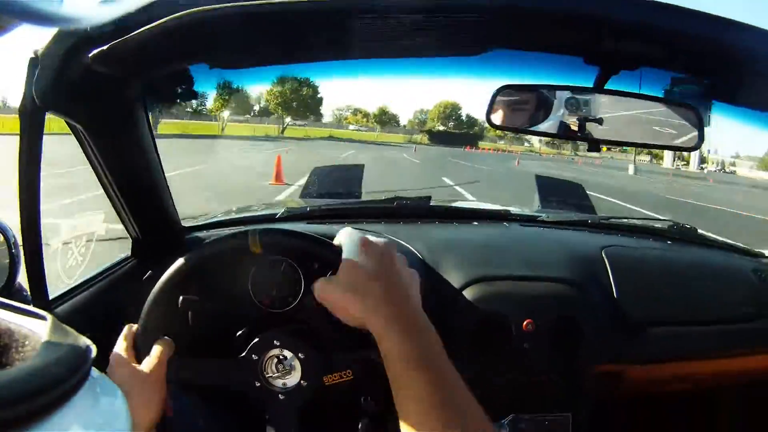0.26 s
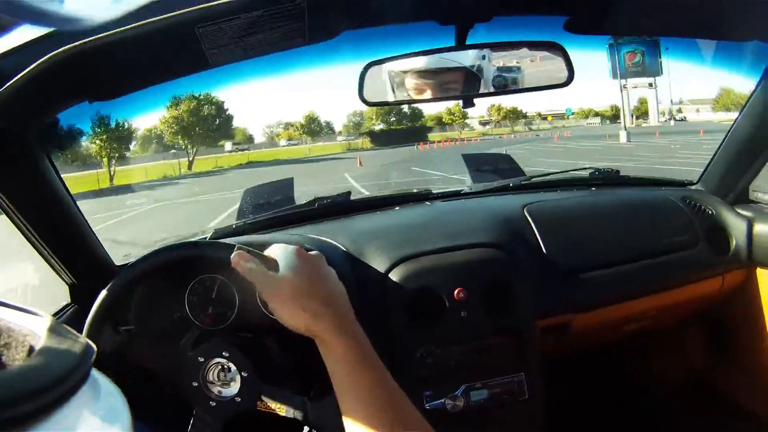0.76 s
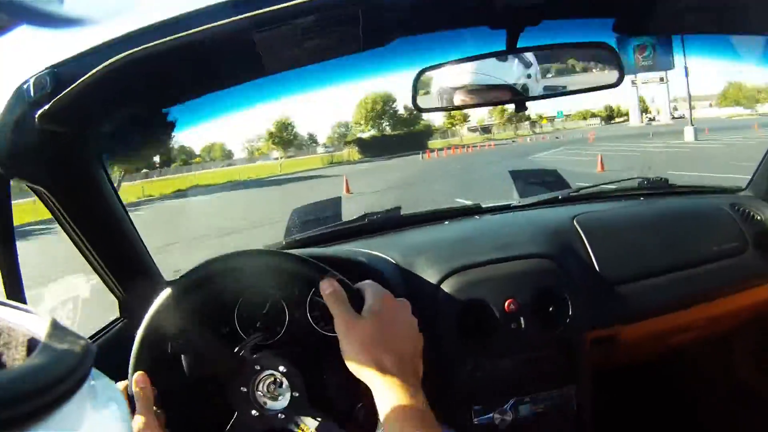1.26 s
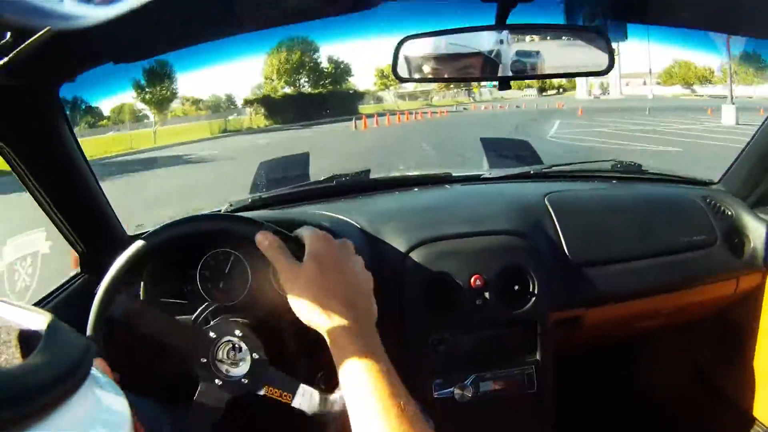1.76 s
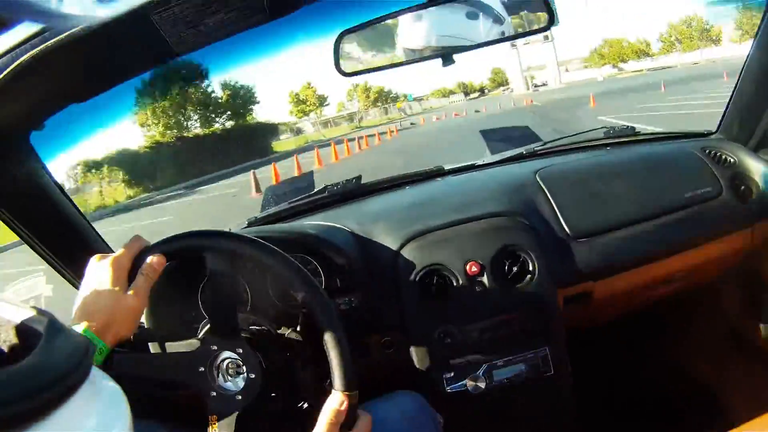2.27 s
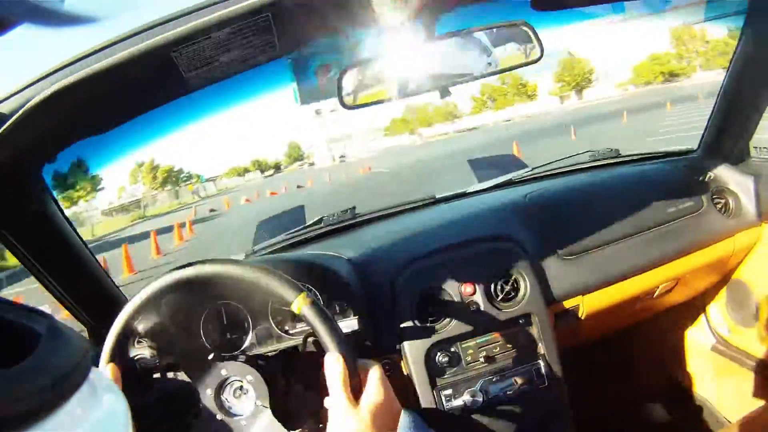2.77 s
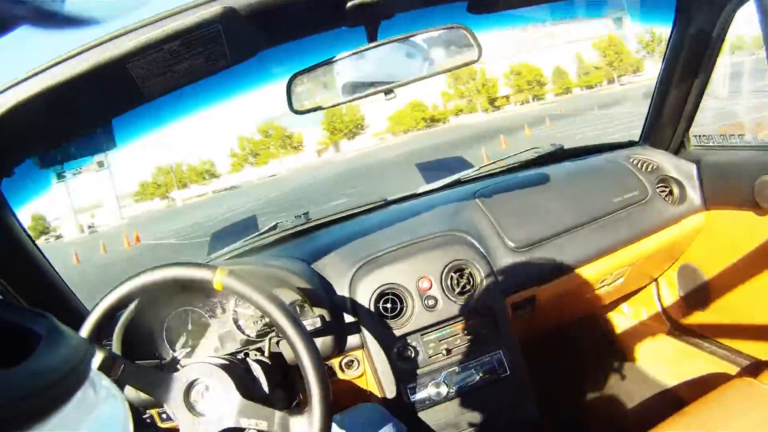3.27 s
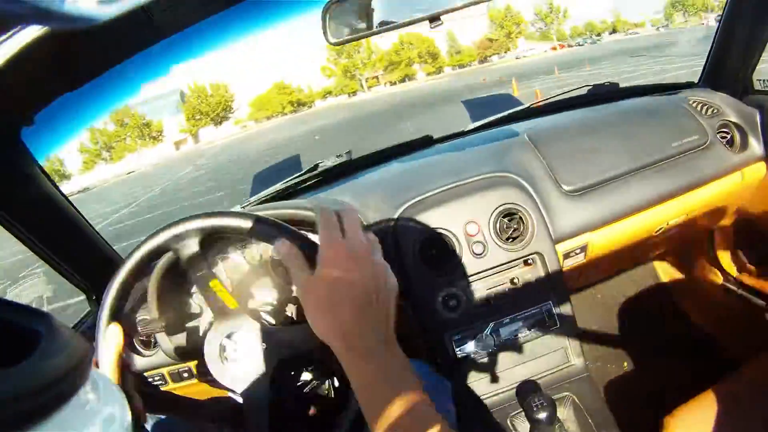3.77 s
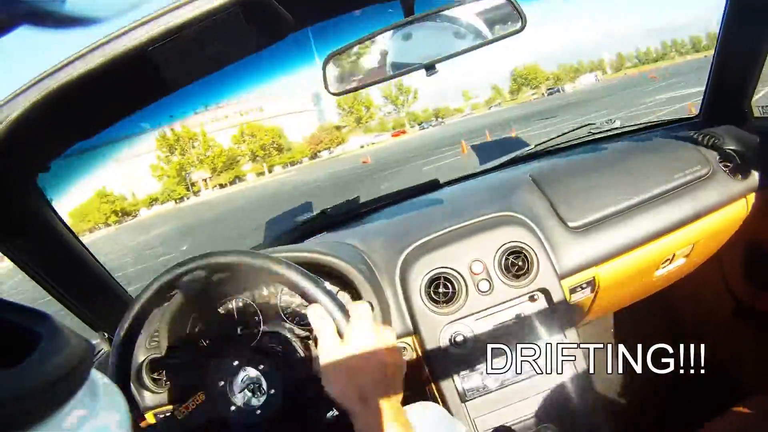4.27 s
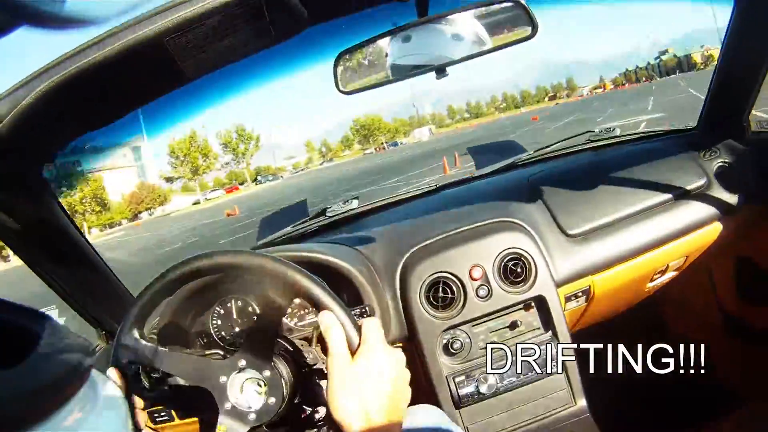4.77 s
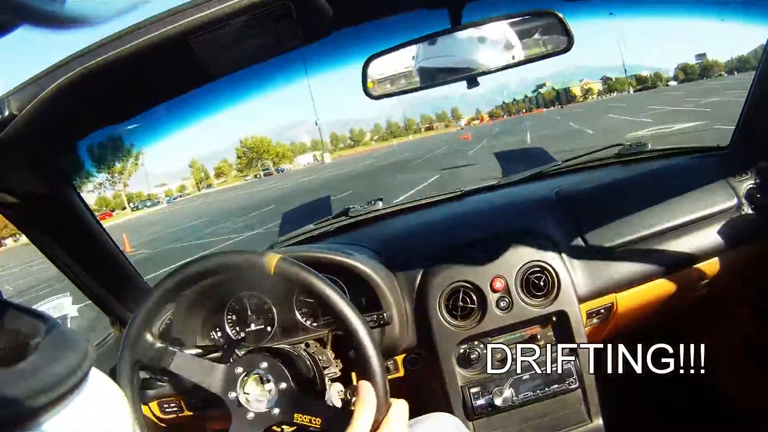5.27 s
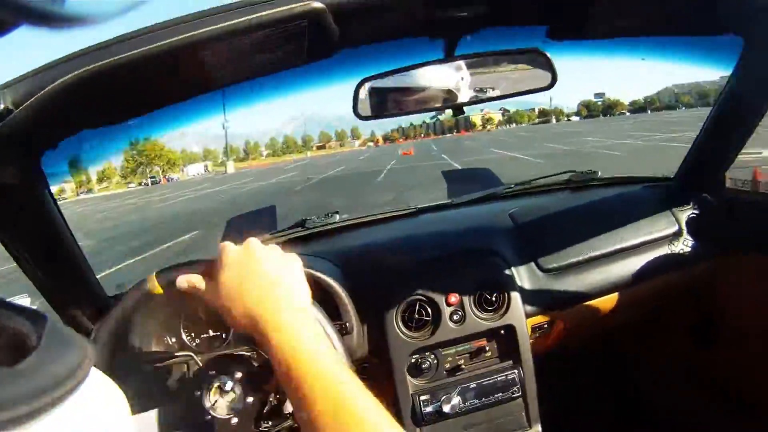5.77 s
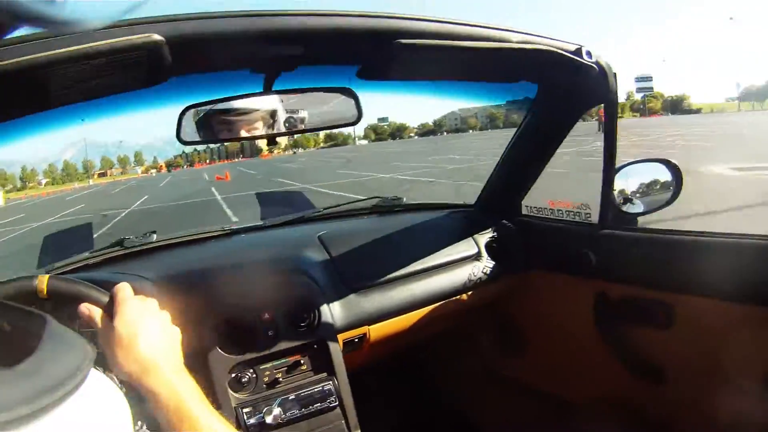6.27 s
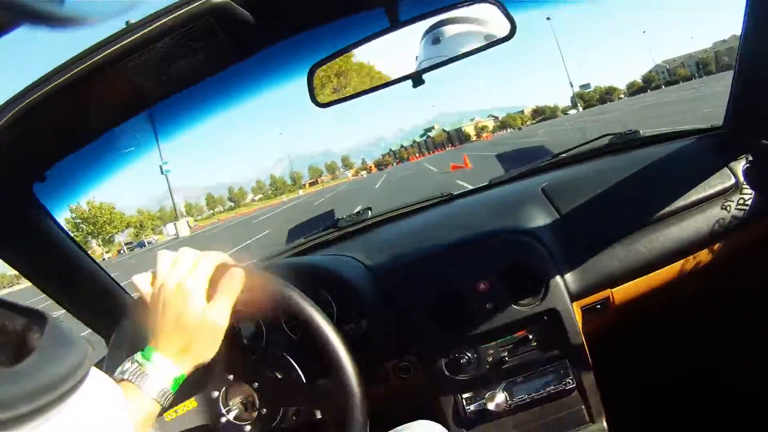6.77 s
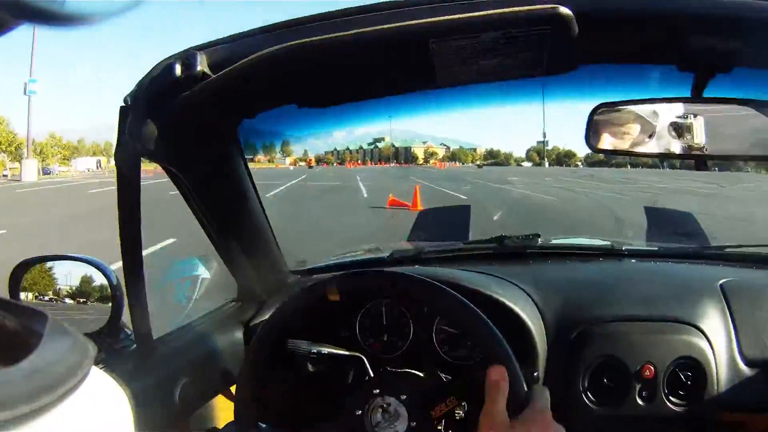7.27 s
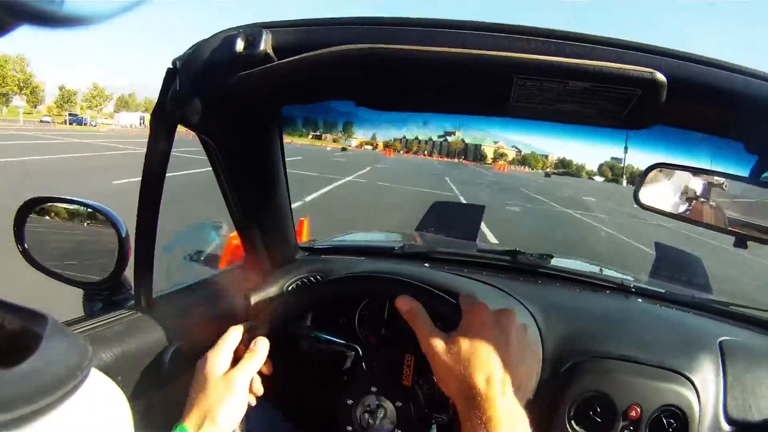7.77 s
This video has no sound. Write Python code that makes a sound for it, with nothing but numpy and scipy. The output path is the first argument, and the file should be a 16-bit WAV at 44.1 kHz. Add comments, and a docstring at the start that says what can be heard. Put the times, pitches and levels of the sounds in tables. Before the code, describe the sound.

Heard from inside an open car, tyres screech in a long skid over thumping wind and a droning engine.

```python
"""Wind thumps and roars over a humming engine, then tyres squeal: a small open car slides through a
long corner on a paved lot. The rubber sticks and slips hundreds of times a second, which makes
it sing, and hisses as it scrubs over the paving. Something loose knocks, and bumps thud.
We listen from a camera inside the car. Its case colours everything, and it holds each
sample at a low rate, which mirrors the sound into the treble."""
import sys
import numpy as np
from scipy import signal
from scipy.fft import rfft, irfft, next_fast_len
from scipy.io import wavfile
from scipy.ndimage import uniform_filter1d

SR = 44100
rng = np.random.default_rng(int(sys.argv[2]) if len(sys.argv) > 2 else 0)


def to_wav(sig):
    """Store sig (one row per channel, or 1-D mono) as 16-bit WAV at the path in sys.argv[1].

    Samples outside -1..1 are clipped; the rate is SR.
    """
    pcm = np.clip(np.atleast_2d(sig), -1, 1) * 32767
    pcm = np.round(pcm).astype(np.int16)
    wavfile.write(sys.argv[1], SR, pcm.T)  # frames by channels


N = 354123

# Levels are starting values: the functions and the camera case raise or lower them.
# air throbbing in the open cabin: t/s, level/dB
CABIN_THROB = [(0, -31), (2.4, -31), (3.1, -33), (4.2, -33), (5.1, -44.5), (5.6, -36.5), (7.0, -41.5),
               (7.45, -33.5), (8.03, -37.5)]
# strong gusts over the windscreen: t/s, length/s, level/dB
WIND_GUSTS = [(0.02, 0.21, -21), (0.3, 0.12, -26), (0.79, 0.16, -20.5), (0.972, 0.051, -22.5),
              (1.06, 0.18, -20.5), (1.442, 0.042, -23), (1.828, 0.062, -21.5), (2.051, 0.029, -23),
              (2.341, 0.12, -25)]
GUST_PEAK_AT = 0.73  # share of the way through a gust
# wind and road roar: t/s, level/dB
ROAR_LEVEL = [(0, -32.5), (2.15, -33), (4.2, -31.5), (6.3, -36.5), (8.03, -32.5)]
# tone colour of the roar: f/Hz, level/dB
ROAR_EQ = [(25, 16), (60, 4), (110, 3), (200, -5.5), (800, -10.5), (6000, -6.5)]

# engine note: t/s, firing f/Hz, level/dB, load boost/dB for all tones but the lowest
ENGINE_NOTE = [(0, 152.4, -48.5, 3), (1.2, 175.7, -49, 1), (1.35, 170.7, -65, -12), (1.5, 167.4, -47.5, -4),
               (1.9, 164.7, -50, -1), (2.65, 133, -50.5, -17), (3.2, 156.4, -49, -4), (3.55, 129.7, -56, 6),
               (3.75, 136.1, -49.5, -2), (4.3, 147.2, -50, 7), (5.2, 141.3, -55.5, -0.5),
               (5.3, 127.6, -46, -1.5), (5.9, 111.5, -50, -11), (6.05, 118.3, -45, -2),
               (6.3, 117, -41, -12), (7.1, 132.4, -47, -1.5), (7.6, 133.7, -43, -2.5),
               (8.03, 140.7, -44.5, -3.5)]
# engine tones: multiple of the firing rate, level/dB
ENGINE_TONES = [(1, 0), (1.75, -13.5), (2, -12), (3, -19.5), (3.5, -18.5)]
PIPE_HZ, PIPE_WIDTH_HZ, PIPE_DB = 482, 39, 8.5  # the exhaust boosts tones near its own pitch

# something loose in the cabin: t/s, level/dB, brightness/dB, time to fade by 60 dB/s
LOOSE_KNOCKS = [(0.9696, -26, 7, 0.048), (0.991, -25, 6, 0.028), (1.016, -22, 0, 0.062),
                (1.043, -29.5, -1, 0.03), (1.5924, -31, 19, 0.07), (7.8197, -23, 22, 0.037)]
# thuds over bumps: t/s, level/dB
ROAD_BUMPS = [(1.43, -26), (4.266, -28), (6.965, -27.5)]

# rubber scrubbing on paving, one list a slide: t/s, level/dB
SCRUB_SLIDES = [
    [(.85, -40), (1.1, -38), (1.7, -44.5)],
    [(1.95, -45.5), (2.54, -32), (3.2, -23), (3.85, -22.5), (4.87, -21), (5.38, -24), (5.81, -23),
     (6.14, -42.5), (6.3, -72)],
    [(6.65, -46), (7.1, -35.5), (7.45, -53)],
]
# tone colour of the scrub: f/Hz, level/dB
SCRUB_EQ = [(400, -46), (690, -4), (800, -5), (2300, 2.5), (3500, -1), (6000, -3.5)]
# A tyre sings at its slip rate (partial 1) and at multiples of it (partials 2, 3, ...).
# lightly loaded treads, one list a slide: t/s, slip f/Hz, partial 1 level/dB, partial 2 level/dB
LIGHT_TREADS = [
    [(0, 945, -55.5, -82), (1.0, 949.4, -51.5, -66), (1.1, 835, -45.5, -66), (1.6, 963, -60.5, -65)],
    [(2.3, 924.5, -44, -63), (2.5, 885.5, -37, -48), (2.9, 881.2, -33, -44.5), (3.4, 865, -34, -42.5)],
    [(5.75, 853, -39, -45), (6.13, 923, -45.5, -60), (6.2, 1034, -70, -71)],
]
# brief thin chirps, one list each: t/s, slip f/Hz, partial 1 level/dB, partial 2 level/dB
TREAD_CHIRPS = [
    [(2.09, 987.4, -44.5, -62), (2.24, 940, -37, -52), (2.36, 859, -50, -50), (2.42, 836, -40, -40)],
    [(6.66, 1058, -53, -64), (6.74, 987, -41.5, -47.5), (6.8, 991, -43, -53)],
    [(6.89, 983, -43, -50), (6.96, 943, -40, -53), (7.08, 1040, -45.5, -57), (7.3, 965, -38, -56)],
    [(6.98, 971.4, -40, -61), (7.13, 849, -38.5, -44.5), (7.24, 888, -43, -51), (7.34, 902, -43, -66)],
    [(6.885, 789, -45, -52), (7.22, 742, -45.5, -75)],
]
# a tyre heard mostly by partial 2: t/s, f/Hz of that partial, level/dB
HIGH_TYRE = [(2.33, 1720, -55), (2.42, 1690, -43), (2.55, 1620, -45.5), (2.95, 1625, -32.5),
             (3.14, 1611, -37.5), (4.5, 1632, -36.5), (5.37, 1592, -42), (5.98, 1576, -39),
             (6.12, 1732, -44.5)]
# steady rasp of two tyres, A and B: t/s, A level/dB, B level/dB
PAIR_RASP = [(2.75, -61, -51), (3.15, -55.5, -58), (4.4, -41.5, -61), (5.5, -40, -41.5), (5.85, -43.5, -50),
             (6.05, -50.5, -52)]
# their bright screeches: t/s, length/s, A level/dB, B level/dB, A slip f/Hz, B slip f/Hz
PAIR_SCREECHES = [(3.199, 0.09, -32.5, -38, 746, 722), (3.334, 0.077, -37, -38.5, 741, 726),
                  (3.47, 0.13, -33.5, -34.5, 715, 714), (3.631, 0.1294, -34, -35.5, 722, 721),
                  (3.894, .2, -34.5, -41, 749, 752), (4.2, 0.11, -38, -42, 755, 755),
                  (4.339, 0.079, -37, -41, 732, 750), (4.5, 0.089, -42, -34, 765, 761),
                  (4.63, 0.13, -34.5, -35, 746, 747), (4.767, 0.093, -32, -34, 731, 727),
                  (4.863, 0.0906, -43, -30, 740, 755.5), (5.004, 0.11, -35.5, -38.5, 735, 741),
                  (5.169, 0.09, -34.5, -33, 724, 717.6), (5.266, 0.14, -31.5, -33, 748, 723),
                  (5.589, 0.099, -38.5, -41, 721, 731)]
# the most loaded tyre, murmuring between squeals: t/s, slip f/Hz, level/dB
LOADED_MURMUR = [(2.35, 760, -53.5), (2.66, 784, -38.5), (3.1, 795, -46), (3.3, 767, -36.5),
                 (5.5, 746, -38), (5.88, 729, -35), (5.97, 758, -38), (6.05, 789, -53)]
# its separate squeals: t/s, length/s, level/dB, slip f/Hz
LOADED_SQUEALS = [(3.177, 0.072, -30, 773), (3.268, 0.12, -29, 757.4), (3.406, 0.079, -26, 750),
                  (3.487, 0.056, -29.5, 724), (3.538, 0.038, -28, 748), (3.575, 0.033, -29, 745),
                  (3.627, 0.053, -25.5, 760), (3.707, 0.084, -29, 729), (3.887, 0.065, -27, 754.5),
                  (3.983, 0.12, -29, 752), (4.1, 0.087, -28, 757.4), (4.202, 0.089, -26.5, 759.4),
                  (4.357, 0.029, -28.5, 717), (4.428, 0.071, -24, 763.5), (4.504, 0.1, -27.5, 756),
                  (4.608, 0.099, -25, 763), (4.797, 0.057, -27.5, 740.5), (4.857, 0.078, -26.5, 759.6),
                  (5.018, 0.081, -28.5, 738.3), (5.13, 0.092, -30.5, 736), (5.283, 0.104, -30, 724.7),
                  (5.393, 0.085, -30, 738), (5.555, 0.027, -28.5, 741), (5.59, 0.039, -32, 728.5),
                  (5.708, 0.07, -30.5, 760), (5.813, 0.038, -30.5, 717)]
# overtones of a squeal: multiple of the slip rate, level/dB against partial 1
SQUEAL_OVERTONES = [(2, -8), (3, -14), (4, -12), (5, -13.5)]
ATTACK_S, RELEASE_S = 0.0093, 0.015  # a burst catches, holds, then lets go

# tone colour of the camera case: f/Hz, level/dB
CASE_EQ = [(600, -2.5), (750, 2), (1040, 2.5), (1250, -9), (1460, 3), (1640, -2), (1800, -8), (1990, 1.5),
           (2350, -0.5), (2600, -10.5), (2900, -6.5), (3280, -17.5), (3780, -10.5), (4100, -21),
           (5800, -27)]
# faint difference between left and right: f/Hz, level/dB against the shared sound
STEREO_SPREAD = [(60, -37), (2380, -24), (15000, -20.5)]
HOLD_HZ, TREBLE_LIMIT_HZ = 12000, 15400
TICK_S, TICK_DB = 7.4528, -25.5  # the waveform jumps once: a dry tick
TIME = np.arange(N) / SR


def gain_of(db):
    """Turn decibels into a multiplier."""
    return 10 ** (np.asarray(db) / 20)


def unit_rms(x):
    """Scale a signal to an average strength (rms) of 1."""
    return x / np.sqrt(np.mean(x ** 2) + 1e-20)


def colour_gains(colour, size):
    """Turn a tone colour table into one multiplier per frequency."""
    hz, db = np.transpose(colour)
    bin_hz = np.fft.rfftfreq(size, 1 / SR)
    return gain_of(np.interp(np.log(bin_hz + 1), np.log(hz + 1), db))


def coloured(x, colour):
    """Give a sound a tone colour."""
    size = next_fast_len(N + 4096)
    return irfft(rfft(x, size) * colour_gains(colour, size), size)[:N]


def curves(rows):
    """A gate that is open from the first row to the last, then each column at every sample."""
    times, *columns = np.transpose(rows)
    gate = np.clip(np.minimum(TIME - times[0] + 0.049, times[-1] + 0.021 - TIME) / 0.051, 0, 1)
    return gate, *(np.interp(TIME, times, column) for column in columns)


def wander(top_hz):
    """A smooth random wobble; a higher top_hz makes it quicker."""
    steps = rng.standard_normal(int(N / SR * 400) + 2)  # 400 steps a second
    smooth = signal.lfilter(*signal.butter(2, np.clip(top_hz / 200, .002, .95)), steps)
    return unit_rms(np.interp(TIME * 400, np.arange(len(steps)), smooth))


def restless_noise(colour, patchy_db, flicker_db):
    """Noise whose pitch bands swell in patches while the whole of it flickers."""
    frames = N // 128 + 5
    real, imag, patches = rng.standard_normal((frames, 257, 3)).T
    patches = uniform_filter1d(patches, size=4, axis=0)  # smooth across pitch
    patches = unit_rms(uniform_filter1d(patches, size=20, axis=1))  # and across time
    flicker = unit_rms(uniform_filter1d(rng.standard_normal(frames), size=10))
    spectra = (real + 1j * imag) * gain_of(patchy_db * patches + flicker_db * flicker)
    white = signal.istft(spectra, nperseg=512, noverlap=384)[1]
    return unit_rms(coloured(white[:N], colour))


def bursts(starts, lengths, levels_db):
    """Loudness of separate bursts: each rises, holds and falls."""
    size = np.zeros(N)
    for start, length, db in zip(starts, lengths, levels_db):
        edges = np.minimum((TIME - start) / ATTACK_S, (start + length - TIME) / RELEASE_S)
        size = np.maximum(size, np.clip(edges, 0, 1) * gain_of(db))
    return size


def sine(cycles, db):
    """A pure tone that starts at a random point in its cycle."""
    return np.sqrt(2) * gain_of(db) * np.sin(2 * np.pi * (cycles + rng.random()))


def gusts():
    """Strength of the gusts: each rises to its peak and drops away faster."""
    size = np.zeros(N)
    for start, length, db in WIND_GUSTS:
        ramp = np.interp(TIME, start + length * np.array([-.15, GUST_PEAK_AT, 1.1]), [0, 1, 0])
        size = np.maximum(size, gain_of(db) * np.sin(np.pi / 2 * ramp))
    return size


def wind():
    """Air throbs and rumbles in the open cabin, over a broad wind and road roar."""
    throb_hz = 40 * (1 + 0.07 * wander(8.05))
    throb = np.sqrt(2) * gain_of(2.5 * wander(25) - 1) * np.sin(2 * np.pi * np.cumsum(throb_hz) / SR)
    rumble = unit_rms(coloured(rng.standard_normal(N), [(18, 6), (40, 18), (75, -0.5), (160, -36.5)]))
    roar = restless_noise(ROAR_EQ, patchy_db=1.5, flicker_db=1.28)
    strength = np.maximum(gain_of(curves(CABIN_THROB)[1] + 2.5 * wander(6.2)), gusts())
    return strength * (throb + gain_of(-10.5) * rumble) + gain_of(curves(ROAR_LEVEL)[1]) * roar


def engine():
    """Tones at multiples of the firing rate; uneven cylinders add the in-between ones."""
    _, firing_hz, db, load_db = curves(ENGINE_NOTE)
    cycles = np.cumsum(firing_hz * (1 + .002 * wander(8))) / SR
    db = db + wander(6)
    out = np.zeros(N)
    for multiple, tone_db in ENGINE_TONES:
        pipe_db = PIPE_DB * np.exp(-((multiple * firing_hz - PIPE_HZ) / PIPE_WIDTH_HZ) ** 2)
        out += sine(multiple * cycles, db + tone_db + (multiple != 1) * load_db + pipe_db)
    return out


def add_hit(mix, start, db, fade_s, colour):
    """Add a puff of noise that starts sharply and falls 60 dB in fade_s."""
    t = TIME[:16384]
    puff = unit_rms(irfft(rfft(rng.standard_normal(len(t))) * colour_gains(colour, len(t))))
    attack = 1 - np.exp(-t / (0.01 * fade_s))
    mix[round(start * SR):][:len(t)] += attack * gain_of(db - 60 * t / fade_s) * puff


def knocks_and_bumps():
    """Something loose clacks and the camera case rings with it; the suspension gives longer, dull thuds."""
    out = np.zeros(N + 16384)
    for start, db, bright_db, fade_s in LOOSE_KNOCKS:
        case_ring = [(1100, -30), (1600, -bright_db), (2650, 3.5), (2850, 13.5), (3050, -1),
                     (6000, bright_db), (7000, -40)]
        add_hit(out, start, db, fade_s, case_ring)
    for start, db in ROAD_BUMPS:
        add_hit(out, start, db, fade_s=.21, colour=[(40, 10), (150, -9), (400, -21.5), (1200, -27)])
    return out[:N]


def scrub():
    """Rubber dragged over the paving hisses during each slide."""
    size = sum(gate * gain_of(db) for gate, db in map(curves, SCRUB_SLIDES))
    return size * restless_noise(SCRUB_EQ, patchy_db=1.5, flicker_db=1.5)


def stick_slip(hz, partials, jitter, jitter_hz, flutter_db):
    """Tread grips and lets go: partials share one shaky pitch, but each swells on its own."""
    cycles = np.cumsum(hz * (1 + jitter * wander(jitter_hz))) / SR
    return sum(sine(multiple * cycles, db + flutter_db * wander(42)) for multiple, db in partials)


def singing_treads(slides, count, spread):
    """Neighbouring tread blocks sing together, each drifting around their common pitch."""
    out = np.zeros(N)
    for gate, hz, db1, db2 in map(curves, slides):
        partials = [(1, db1 - 9), (2, db2 + 1)]
        for _ in range(count):
            own_hz = hz * (1 + spread * wander(5))
            out += gate * stick_slip(own_hz, partials, jitter=.015, jitter_hz=50, flutter_db=3.2)
    return out


def high_tyre():
    """One tyre sings loudest an octave above its slip rate."""
    gate, hz, db = curves(HIGH_TYRE)
    partials = [(1, db - 10.5), (2, db + 2)]
    return gate * stick_slip(hz / 2, partials, jitter=.012, jitter_hz=45, flutter_db=3)


def screeching_pair():
    """Two tyres rasp on their upper partials and swell into bright screeches."""
    starts, lengths, top_a, top_b, *slip_rates = np.transpose(PAIR_SCREECHES)
    hz_a, hz_b = (np.interp(TIME, starts + lengths / 2, hz) for hz in slip_rates)
    gate, rasp_a, rasp_b = curves(PAIR_RASP)
    db_a = 20 * np.log10(np.maximum(gain_of(rasp_a), bursts(starts, lengths, top_a)))
    db_b = 20 * np.log10(np.maximum(gain_of(rasp_b), bursts(starts, lengths, top_b)))
    shaky = dict(jitter=.0035, jitter_hz=15, flutter_db=1.6)
    tyre_a = stick_slip(hz_a, [(2, db_a)], **shaky)
    tyre_b = stick_slip(hz_b, [(3, db_b), (4, db_b - 1)], **shaky)
    return gate * (tyre_a + tyre_b)


def loaded_tyre():
    """The tyre carrying most weight murmurs roughly and locks into a clean squeal in bursts."""
    gate, hz, db = curves(LOADED_MURMUR)
    murmur = gate * stick_slip(hz, [(0.99, db)], jitter=.01207, jitter_hz=30.7, flutter_db=4)
    starts, lengths, top_db, slip_hz = np.transpose(LOADED_SQUEALS)
    squeal_hz = np.interp(TIME, starts + lengths / 2, slip_hz)
    size = bursts(starts, lengths, top_db)
    squeal = stick_slip(squeal_hz, [(1, 0)] + SQUEAL_OVERTONES, jitter=.004, jitter_hz=15, flutter_db=1.5)
    murmur_share = np.clip(1 - size / gain_of(db), 0, 1)  # gives way as a squeal grows
    return size * squeal + murmur_share * murmur


def tyres():
    """All the singing rubber, over the broad scrub."""
    out = loaded_tyre() + screeching_pair() + high_tyre()
    out += singing_treads(LIGHT_TREADS, count=7, spread=.065)
    out += singing_treads(TREAD_CHIRPS, count=3, spread=.022)
    return out + scrub()


def scene():
    """One microphone inside the case feeds both channels."""
    heard = coloured(engine() + wind() + tyres() + knocks_and_bumps(), CASE_EQ)
    return np.array([heard, heard])


def record(dry):
    """Held samples mirror the sound upward; then come a tick, faint stereo width and a treble cut."""
    low_rate = signal.resample_poly(dry, HOLD_HZ, SR, axis=1)
    held = np.repeat(low_rate, 15, axis=1)
    out = signal.resample_poly(held, SR, HOLD_HZ * 15, axis=1)[:, :N]
    since_tick = TIME - TICK_S
    out -= gain_of(TICK_DB) / 2 * np.sign(since_tick) * np.exp(-abs(since_tick) / 0.0016)
    spectra = signal.stft(out[0], nperseg=1024)[2]
    scrambled = spectra * np.exp(2j * np.pi * rng.random(spectra.shape))  # same colour, random phase
    blurred = signal.istft(scrambled, nperseg=1024)[1][:N]
    out += coloured(blurred, STEREO_SPREAD) * [[1.], [-1.]]  # added left, taken away right
    treble_cut = signal.firwin(801, TREBLE_LIMIT_HZ, window=("kaiser", 9), fs=SR)
    return signal.oaconvolve(out, treble_cut[None], "same")


dry = scene()
out = record(dry)
to_wav(out)
```